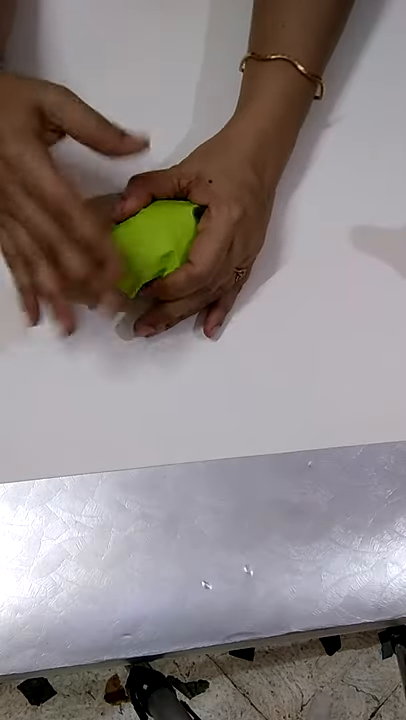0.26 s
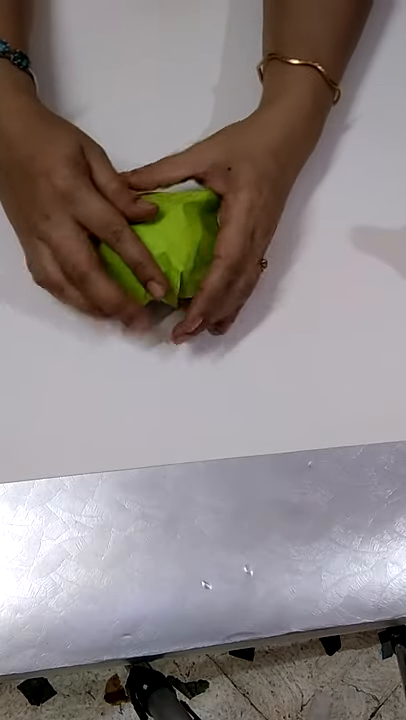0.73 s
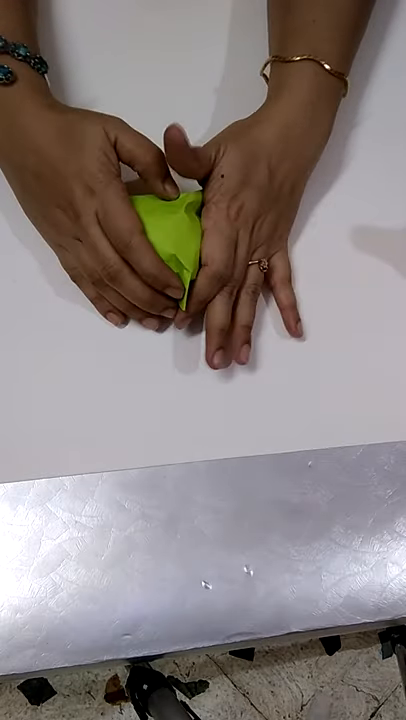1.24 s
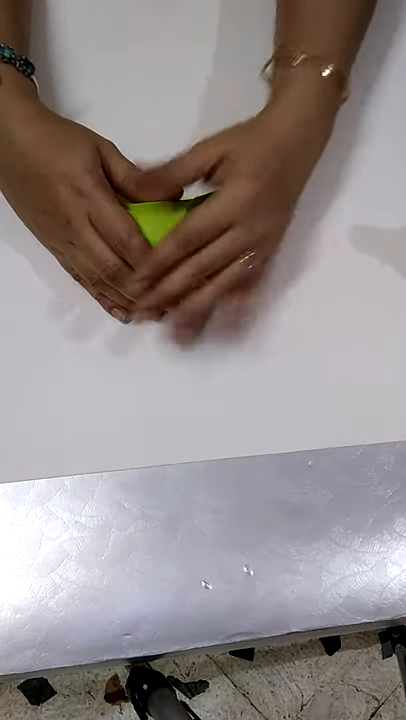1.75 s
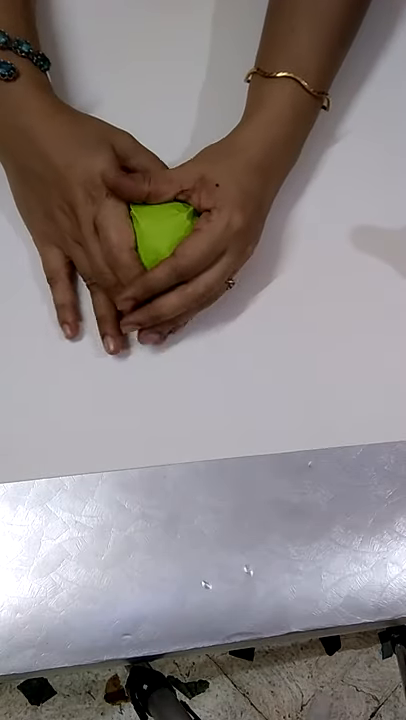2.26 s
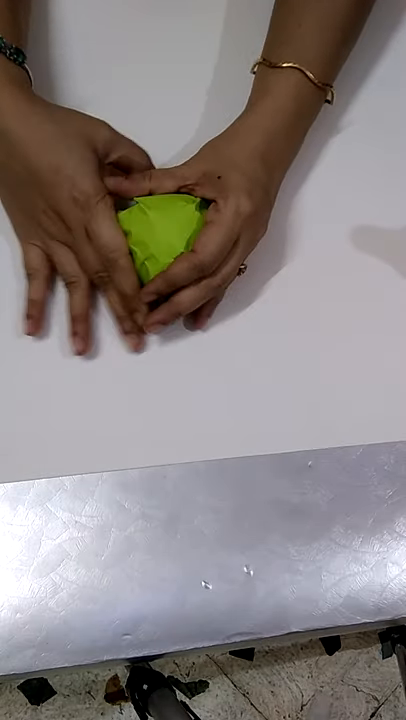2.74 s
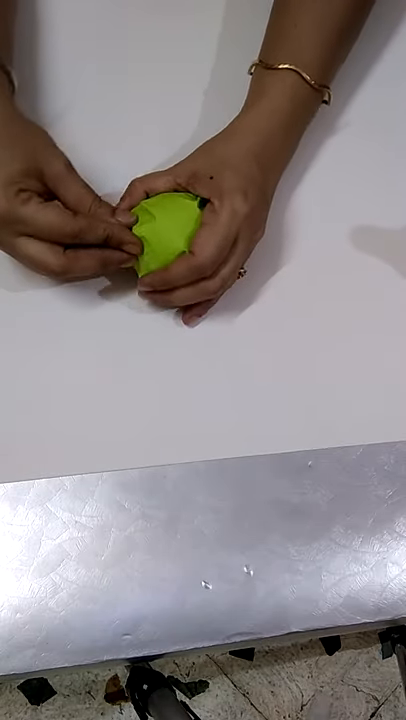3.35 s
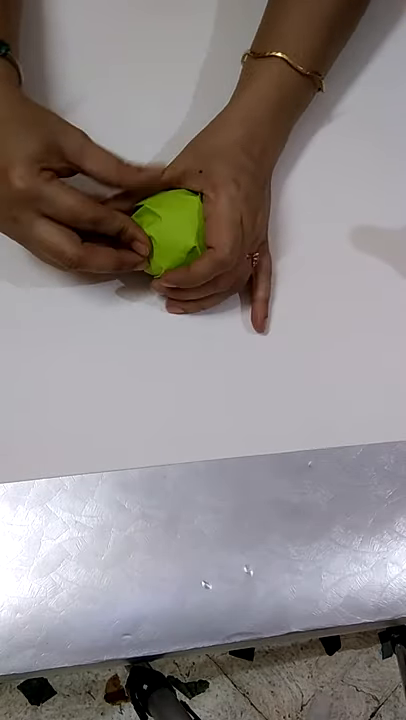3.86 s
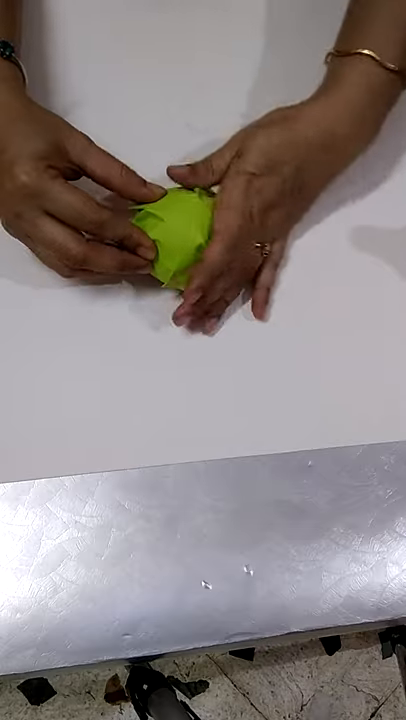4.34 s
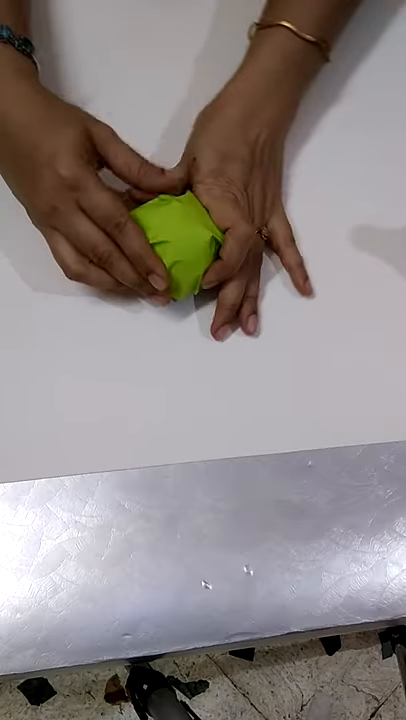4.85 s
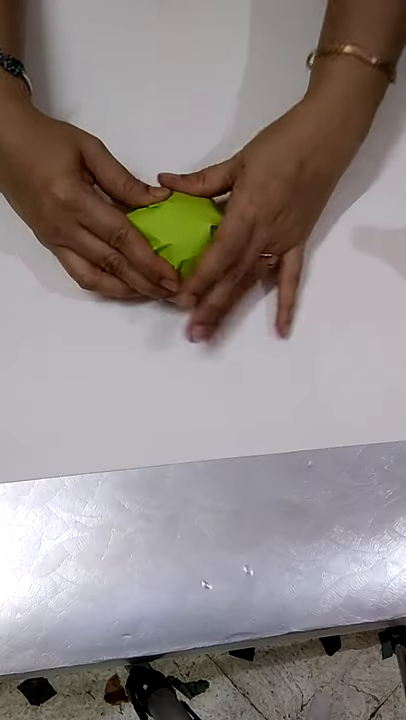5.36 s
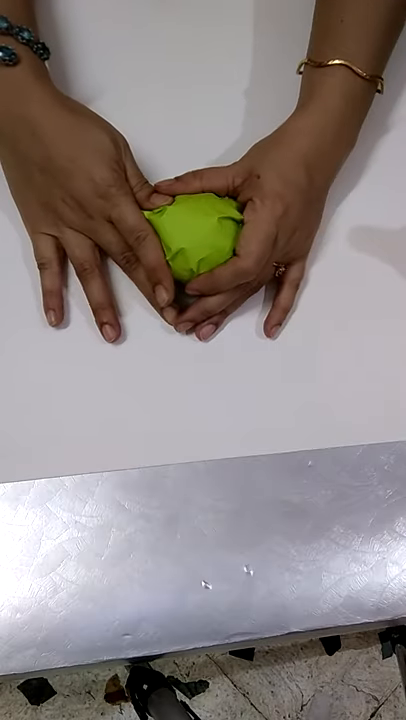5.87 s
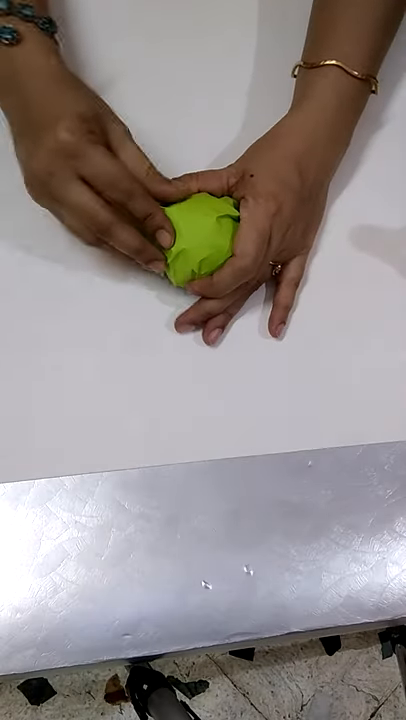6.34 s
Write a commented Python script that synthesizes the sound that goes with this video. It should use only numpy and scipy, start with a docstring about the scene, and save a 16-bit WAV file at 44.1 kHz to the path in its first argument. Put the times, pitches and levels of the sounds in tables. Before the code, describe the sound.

Stiff paper crackles and snaps in sharp, uneven creases as hands fold it around a ball, with soft knocks on a table indoors.

```python
"""Stiff paper is pressed and folded by hands around a ball on a table in a bare, echoing room.
Creases snap and slips rustle as shaped noise through broad paper resonances; trapped air pops as short sines.
Fingers and ball knock the table top, whose ringing modes boom briefly.
Near echoes and a noise tail make the room; quiet air lies under it all and a faint hum comes and goes."""
import sys
import numpy as np
from scipy import signal
from scipy.fft import rfft, irfft
from scipy.io import wavfile

SR = 44100
rng = np.random.default_rng(int(sys.argv[2]) if len(sys.argv) > 2 else 0)


def int16_out(signal):
    """Quantize to a 16-bit WAV file."""
    q = np.round(np.clip(np.atleast_2d(signal).T, -1, 1) * 32767)
    wavfile.write(sys.argv[1], SR, q.astype(np.int16))


def invert_db(x):
    """Field ratio 10**(x/20) for x, a level in decibels (scalar or array-like)."""
    u = np.asarray(x, float) / 20
    return 10 ** u


N = 291060   # length in samples


def rms_one(x):
    """Scale to rms 1."""
    return x / np.sqrt(np.mean(x ** 2) + 1e-20)


def at_hz(points, hz):
    """Read a table of (frequency, value) on a log-frequency axis."""
    table_hz, values = np.array(points).T
    return np.interp(np.log(hz + 1), np.log(table_hz), values)


def drift(rate_hz):
    """Slow chance with spread 1: low-passed noise, drawn at every 40th sample."""
    r = np.exp(-80 * np.pi * rate_hz / SR)
    white = rng.standard_normal(N // 40 + 2002)
    slow = signal.lfilter([1], [1, -2 * r, r * r], white)[2000:]   # skip the filter's start
    return np.interp(np.arange(N) / 40, np.arange(len(slow)), rms_one(slow))


def resonate(x, hz, width_hz):
    """A broad resonance with gain 1 on top."""
    r = np.exp(-np.pi * width_hz / SR)
    gain = (1 - r * r) / 2
    return signal.lfilter([gain, 0, -gain], [1, -2 * r * np.cos(2 * np.pi * hz / SR), r * r], x + 1e-18)


def ring(clicks, hz, t60):
    """A unit click sets a decaying sine of height 1 ringing."""
    r, w = invert_db(-60 / (t60 * SR)), 2 * np.pi * hz / SR
    return signal.lfilter([0, np.sin(w)], [1, -2 * r * np.cos(w), r * r], clicks + 1e-18)


def grains(per_s, spread_db):
    """Clumped random clicks with a long tail of big ones; rms 1."""
    sizes = invert_db(spread_db * np.minimum(rng.exponential(1, N), 4.5)) * rng.choice([-1, 1], N)
    chance = per_s * invert_db(4.0 * drift(25)) / SR
    return rms_one(sizes * (rng.random(N) < chance))


def high_pass(x, hz):
    """Second-order high-pass."""
    return signal.sosfilt(signal.butter(2, hz, "high", fs=SR, output="sos"), x)


# resonance of the air trapped under the folds: (frequency [Hz], width [Hz], gain [dB])
FOLD_AIR_RESONANCE = [(1620, 2700, 20.5)]
# resonances of the paper sheet: (frequency [Hz], width [Hz], gain [dB])
SHEET_RESONANCES = [(2815, 2000, 3.5), (4120, 870, 12.67), (6180, 11500, 9.96), (11600, 3070, 17.02)]


def through_paper(drives):
    """Trapped air and sheet resonate, each on its own drive; neighbouring resonances alternate in sign."""
    out = 0
    for k, (drive, (hz, width_hz, db)) in enumerate(zip(drives, FOLD_AIR_RESONANCE + SHEET_RESONANCES)):
        out = out + (-1) ** k * invert_db(db) * resonate(drive, hz, width_hz)
    return out


def place(s, peak_db, shapes, lead):
    """Scale each shape to its peak and set it in time; a small sheet radiates little of the lows."""
    out = np.zeros(N + shapes.shape[1])
    shapes = invert_db(peak_db)[:, None] * shapes / np.abs(shapes).max(axis=1, keepdims=True)
    starts = np.round(s * SR).astype(int)[:, None] - lead
    np.add.at(out, starts + np.arange(shapes.shape[1]), shapes)
    return high_pass(out[:N], 690)


# fingers sliding over the paper: (start [s], drive level ahead of the paper [dB], length before the fade [s])
FINGER_SLIDES = [(0.152, -51.5, 0.02), (0.486, -53.5, 0.062), (0.8, -73, 0.073), (0.899, -51.5, 0.021),
                 (1.014, -53, 0.041), (1.61, -61.5, 0.037), (1.906, -54.5, 0.068), (2.11, -40, 0.015),
                 (2.314, -62.5, 0.02), (2.551, -55.5, 0.014), (2.787, -52.5, 0.039), (3.226, -53, 0.019),
                 (4.713, -54, 0.055), (5.313, -53.5, 0.046), (6.059, -57.5, 0.088)]
# pitches of the small air pockets: (frequency [Hz])
POCKET_PITCHES = [1296, 1500, 2010]
TICKS_PER_S, TICKS_DB = 470, -7   # lesser creases at random; level relative to the slips
POCKETS_PER_S = 200   # small air pockets popping at random


def rustle(level_db, air_db=24.0, hollow_db=-18.0, rise=0.099):
    """Tiny slips of paper on paper: a thin bed with ticks and pockets, and a rush under each sliding finger."""
    t = np.arange(N) / SR
    sheet, air = invert_db(level_db + 6.0 * drift(14.5)), 0
    ticks = invert_db(level_db + TICKS_DB) * grains(TICKS_PER_S, spread_db=5.0)
    pockets = invert_db(level_db + air_db) * grains(POCKETS_PER_S, spread_db=10.0)
    for s, sheet_db, length_s in FINGER_SLIDES:
        swell = np.clip((t - s) / (rise * length_s), 0, 1)
        fade = np.clip((s + 2 * length_s - t) / length_s, 0, 1) ** 2
        sheet = sheet + invert_db(sheet_db) * swell * fade
        air = air + invert_db(sheet_db + hollow_db) * swell * fade
    # each tick excites one sheet resonance, each pocket has one pitch
    part = rng.integers(0, len(SHEET_RESONANCES), N)
    pocket = rng.integers(0, len(POCKET_PITCHES), N)
    slips = sheet * grains(2000, spread_db=3.5)
    small = 0
    for k, hz in enumerate(POCKET_PITCHES):
        small = small + resonate(resonate(pockets * (pocket == k), hz, 700), hz, 700)
    air_drive = air * grains(500, spread_db=4.0)
    sheet_drives = [slips + ticks * (part == k) for k in range(len(SHEET_RESONANCES))]
    return small + through_paper([air_drive] + sheet_drives)


# the clearest knocks on the table: (time [s], push [dB], lean towards the upper modes [dB])
TABLE_KNOCKS = [(0.139, -31, -7.5), (0.252, -37.5, 11.5), (0.387, -53, 25.5), (0.492, -29, -4.5),
                (1.171, -41, -18), (1.215, -27, -3.5), (1.283, -33, 1.5), (1.324, -33.5, -12.5),
                (1.418, -24, 6), (1.559, -32, 1.5), (1.871, -53.5, 20.5), (1.97, -25.5, -7.5),
                (2.108, -21, -5), (2.195, -24, 5.5), (2.23, -23.5, 1), (2.254, -27, 7), (2.398, -35.5, 5.5),
                (2.469, -29, -1.5), (2.559, -30, 4), (2.622, -32.5, -2), (2.648, -32, 4),
                (2.809, -27.5, -3.5), (2.99, -40, 16), (3.061, -40, 21.5), (3.233, -27.5, -5),
                (3.725, -41, 19.5), (3.809, -38, 7), (4.257, -26.5, 0), (4.589, -36.5, 9.5),
                (4.637, -33, 0.5), (4.908, -30.5, 0), (5.008, -30, 4.5), (5.043, -26, 5.5),
                (5.226, -49.5, 26), (5.281, -45.5, 21), (5.331, -26.5, 5), (5.513, -47, 20.5),
                (5.543, -44, 14), (5.639, -42.5, 1), (5.862, -26.5, 4.5), (5.884, -27, 7.5),
                (5.929, -29, 4), (6.095, -44, 12)]
# modes of the table top: (frequency before detuning [Hz], level [dB], nominal t60 [s])
TABLE_MODES = [(64.9, -24.5, 0.39), (98.3, 2, 0.013), (177.4, 2, 0.25), (224.2, 4.5, 0.12), (271, 2, 0.05),
               (385.6, -9, 0.12), (571.4, -13, 0.063), (722, -14.5, 0.048)]
PRESS_S = 0.004   # time constant of a soft knock's build-up
DAMPED_S = 0.097   # the hands soon still the upper modes
DETUNE = 0.04   # resting hands shift each mode by this share (spread) from knock to knock
THUD, THUD_S = 0.99, 0.0044   # extra share at a knock's first swing, and its decay time
BUMP_UPPER_DB = 4   # the light ball stirs the upper modes more than a finger does


def table(rumble_db, contact_hz=700):
    """Soft knocks and the shuffling ball set the table's modes ringing, a little differently every time."""
    s, peak_db, upper_db = np.transpose(TABLE_KNOCKS)
    t, out = np.arange(SR // 3) / SR, np.zeros(N)
    at = np.round(s * SR).astype(int)[:, None] + np.arange(len(t))
    own = rng.standard_normal((len(s), len(TABLE_MODES), 3))   # each knock's own strength, pitch and decay
    shuffle = invert_db(rumble_db) * grains(150, spread_db=3.5)
    build = 1 - np.exp(-t / PRESS_S)
    thud = 1 + THUD * np.exp(-t / THUD_S)
    for k, (hz, level_db, t60) in enumerate(TABLE_MODES):
        # a knock away from the middle shifts strength from the main boom to the modes above it
        lean = np.clip(np.log2(hz / 200) * 2.5, -.5, .9) * (hz > 150)
        strength = invert_db(peak_db + 2.5 * own[:, k, 0] + upper_db * lean)[:, None]
        own_hz = hz * (1 + DETUNE * own[:, k, 1:2])
        own_t60 = t60 * invert_db(1.2 * own[:, k, 2:])
        rings = np.sin(2 * np.pi * own_hz * t) * invert_db(-60 * t / own_t60)
        rings = rings * np.exp(-(t / DAMPED_S) ** 2 * (hz > 150)) * thud
        knocks = np.bincount(at.ravel(), (strength * rings * build).ravel(), N + len(t))[:N]
        # every bump strikes each mode differently
        strikes = invert_db(BUMP_UPPER_DB * lean) * shuffle * rng.standard_normal(N)
        bumps = ring(strikes, hz, 0.83 * t60)
        # a free plate radiates little far below each of its modes
        out += invert_db(level_db) * high_pass(knocks + bumps, 1.22 * hz)
    return signal.sosfilt(signal.butter(4, contact_hz, fs=SR, output="sos"), out)   # fingertips are soft


# colour of the room air before scaling: (frequency [Hz], relative density [dB per Hz])
AIR_SPECTRUM = [(30, -12), (62, 8), (90, -13), (1500, -15), (3000, -22), (16000, -48)]


def room_air():
    """Quiet air: coloured noise, half of its power common to both sides."""
    hz = np.fft.rfftfreq(N, 1 / SR)
    colour = invert_db(at_hz(AIR_SPECTRUM, hz))
    mid, left, right = irfft(rfft(rng.standard_normal((3, N))) * colour, N)
    return invert_db(-67.5) * rms_one(0.99 * mid + np.array([left, right]))


# colour difference of the two microphone ports: (frequency [Hz], left minus right [dB])
PORT_COLOUR = [(60, -6.5), (180, -2.5), (700, -3.5), (2500, -3.5), (7000, -4.5), (15000, 4)]
LEFT_LAG_S = 0.000142


def at_ports(x):
    """The left port hears the direct sound a little later and with another colour."""
    hz = np.fft.rfftfreq(N, 1 / SR)
    tilt, spectrum = invert_db(at_hz(PORT_COLOUR, hz) / 2), rfft(x)
    left = irfft(spectrum * tilt * np.exp(-2j * np.pi * hz * LEFT_LAG_S), N)
    return np.array([left, irfft(spectrum / tilt, N)])


# near echoes off hands and table: (delay [s], left level [dB], right level [dB])
NEAR_ECHOES = [(.0024, -14, -12), (.0044, -11, -9)]
# decay of the room: (frequency [Hz], t60 [s])
ROOM_DECAY = [(500, 0.2), (1500, 0.4), (12000, 0.31)]
ROOM_DB, ROOM_GAP_S = -6, 0.012   # the wall tail stays faint until the gap has passed
ECHO_SMEAR_S = 0.001   # rough surfaces spread each echo


def room(paper, boom, boom_db=2.0):
    """Near echoes of the paper, then wall noise dying band by band, unlike on each side."""
    t, edges, tail = np.arange(SR // 2) / SR, 400 * 2 ** np.arange(0, 5.6, .5), 0
    white = rng.standard_normal((2, 2, len(t)))   # neighbouring bands take turns on two noises
    for k, (low, high) in enumerate(zip(edges, edges[1:])):
        band_pass = signal.butter(2, [low, high], "band", fs=SR, output="sos")
        band = signal.sosfilt(band_pass, white[k % 2])
        tail = tail + band * invert_db(-60 * t / at_hz(ROOM_DECAY, np.sqrt(low * high)))
    tail = tail * np.clip((t - ROOM_GAP_S) / 0.0012, .15, 1)
    tail = invert_db(ROOM_DB) * tail / np.sqrt((tail ** 2).sum(axis=1, keepdims=True))
    near = 0
    for delay_s, left_db, right_db in NEAR_ECHOES:
        smear = rng.standard_normal(tail.shape) * np.exp(-((t - delay_s) / ECHO_SMEAR_S) ** 2)
        smear = smear / np.sqrt((smear ** 2).sum(axis=1, keepdims=True))
        near = near + invert_db(np.array([[left_db], [right_db]])) * smear
    paper_answer = signal.fftconvolve(paper[None], tail + near, axes=1)
    boom_answer = signal.fftconvolve(invert_db(boom_db) * boom[None], tail, axes=1)
    return (paper_answer + boom_answer)[:, :N]


# single creases buckling, loud and faint: (time [s], peak before the high-pass [dB], brightness [dB per octave])
TIMED_CREASES = [(0.068, -22.5, -4.5), (0.2275, -17, 2.5), (0.3865, -24.5, 0), (0.8901, -29, 4),
                 (1.007, -18.5, -11), (1.1848, -3.5, -3.5), (1.4781, -22, -14), (1.641, -54, 11),
                 (1.8667, -25.5, -1), (2.441, -29.5, 0), (2.472, -37.5, -6), (2.811, -33, 8),
                 (3.031, -23, -5), (3.0625, -22, -3), (3.169, -40, 0), (3.2328, -21.5, 2.5),
                 (3.297, -24, 2.5), (3.3064, -12.5, 0), (3.431, -28.5, 4), (3.482, -26, 3.5),
                 (3.5049, -20, -0.5), (3.71, -26, -3.5), (3.728, -14.5, -2), (3.7472, -18.5, -2.5),
                 (3.762, -18.5, 15), (3.789, -25, -1), (3.808, -13, -0.5), (3.9132, -12, 5.5),
                 (3.922, -48, -1), (4.019, -52, 13), (4.1944, -28, 4), (4.3875, -22.5, -3),
                 (4.4445, -10.5, 2.5), (4.6499, -21, -5), (4.656, -23, -9), (4.686, -17, -2.5),
                 (4.956, -23, -15), (4.96, -7, -4), (5.226, -19, 14), (5.2824, -21.5, 3.5),
                 (5.3324, -20, -1), (5.682, -29, -2), (5.7782, -29, 0), (5.8028, -24.5, 1.5),
                 (5.829, -19, 0), (5.8619, -19, -13.5), (5.909, -20, -1.5), (5.9267, -19, -2),
                 (6.0108, -19.5, -2), (6.3464, -25.5, 2.5), (6.3648, -16, 3), (6.4255, -1.5, 0.5),
                 (6.4294, -9.5, 1), (6.5168, -16.5, 0.5), (6.5374, -19, 4)]


def creases(build_s=0.0002, burst_s=0.0007, debris_s=0.006, tear=0.22, debris=0.04, lead_in=0.02):
    """Each buckle starts with faint swelling noise, gives one sharp step, tears on and sheds uneven clicks."""
    s, peak_db, bright_db = np.transpose(TIMED_CREASES)
    steps = np.arange(-220, 700)   # samples from the sharp step
    noise = rng.standard_normal((len(s), 3, len(steps)))
    time_s = np.where(steps < 0, build_s, burst_s)
    bursts = tear * noise[:, 0] * np.exp(-np.abs(steps) / (time_s * SR))
    bursts += lead_in * noise[:, 1] * (steps < 0) * (1 - steps / steps[0])
    bursts += debris * noise[:, 2] ** 3 / 4 * (steps > 0) * np.exp(-steps / (debris_s * SR))
    bursts[:, steps == 0] = np.sign(bursts[:, steps == 0])   # the sharp step itself
    # brightness tilts the drives of the sheet around 7 kHz
    drives = [bursts * invert_db(bright_db * np.log2(hz / 7000))[:, None] for hz, *_ in SHEET_RESONANCES]
    return place(s, peak_db, through_paper([0 * bursts] + drives), -steps[0])


# tones of the hum: (frequency [Hz], rms before the spells' gain [dB])
HUM_TONES = [(457, -88.5)]
# the hum comes and goes: (start [s], end [s], gain [dB])
HUM_TIMES = [(0.412, 1.136, 13), (1.55, 3.012, 22.5), (6.056, 6.592, 20)]
HUM_FADE_S = 0.028


def room_hum():
    """A faint, slightly wavering sine hum, faded in and out for each spell."""
    t = np.arange(N) / SR
    tones = sum(invert_db(db) * np.sqrt(2) * np.sin(2 * np.pi * hz * t) for hz, db in HUM_TONES)
    spells = 0
    for start, end, db in HUM_TIMES:
        spells = spells + invert_db(db) * np.clip(np.minimum(t - start, end - t) / HUM_FADE_S, 0, 1)
    return tones * spells * invert_db(0.48 * drift(6))


# air trapped under a fold pops: (time [s], peak before the high-pass [dB], pitch [Hz])
AIR_POPS = [(0.817, -45.5, 1060), (1.0046, -35, 2150), (1.1853, -12, 1730), (1.418, -27.5, 1970),
            (1.4752, -24.5, 2700), (1.546, -29, 1400), (2.3367, -35.5, 1370), (2.55, -30, 1490),
            (2.6221, -34.5, 1500), (2.638, -28.5, 2280), (2.693, -29.5, 2350), (2.812, -28, 1560),
            (2.9742, -33, 1470), (2.988, -29.5, 1500), (3.001, -25, 1700), (3.029, -21, 1940),
            (3.0623, -19.5, 1940), (3.2332, -26.5, 2240), (3.689, -35.5, 1470), (3.728, -27.5, 1400),
            (4.235, -46.5, 1400), (4.3873, -28, 1590), (4.649, -39, 1540), (4.762, -35, 1500),
            (4.96, -8.5, 1440), (5.2259, -33.5, 1410), (5.282, -33.5, 1320), (5.3318, -28, 1870),
            (5.512, -44, 1340), (5.57, -36, 1440), (5.682, -42, 1570), (5.779, -36, 1470),
            (5.829, -26.5, 1710), (5.8609, -27.5, 1100), (5.8836, -32, 1250), (5.909, -28, 1500),
            (6.0107, -32, 1500), (6.111, -43, 1340), (6.135, -39, 1370), (6.4251, -16, 1660)]
POCKET_CYCLES = 0.55   # cycles that the air under a fold takes to swell; it dies at the same pace


def pops():
    """The air under a fold swells and dies at its own pitch."""
    s, peak_db, hz = np.transpose(AIR_POPS)
    cycles = hz[:, None] * np.arange(512) / SR
    swell = cycles * np.exp(-cycles / POCKET_CYCLES)
    return place(s, peak_db, np.sin(2 * np.pi * cycles) * swell, 10)


# how busy the hands are: (time [s], slips in the paper [dB], bumps on the table [dB])
HAND_ACTIVITY = [(0, -54.5, -67), (.35, -149, -89.5), (0.698, -81, -103), (1.1, -71.5, -100),
                 (1.298, -59.5, -74.5), (1.55, -86, -70), (1.75, -85.5, -90), (2.298, -66.5, -63),
                 (2.76, -73, -88), (3.05, -57.5, -68.5), (3.25, -121, -84.5), (3.651, -91, -88),
                 (3.8, -82, -81.5), (4.12, -79.5, -89), (4.3, -71.5, -71), (4.55, -86, -100),
                 (4.751, -96.5, -84), (5.049, -56.5, -75.5), (5.45, -102.5, -88.5), (5.647, -58.5, -74.5),
                 (6.1, -95.5, -75), (6.3, -125, -107), (6.6, -76, -64.5)]


def scene():
    """Paper in the room, table under it, air and hum around."""
    s, *columns = np.transpose(HAND_ACTIVITY)
    rustle_db, rumble_db = (np.interp(np.arange(N) / SR, s, column) for column in columns)
    paper = rustle(rustle_db) + creases() + pops()
    boom = table(rumble_db)
    return at_ports(paper + boom) + room(paper, boom) + room_air() + room_hum()


def suppress(x, split_hz=650, open_db=-64, depth_db=15.0, follow_hz=12):
    """The recorder's noise suppressor turns the upper band down while that band is faint."""
    upper = signal.sosfiltfilt(signal.butter(2, split_hz, "high", fs=SR, output="sos"), x)
    r = np.exp(-2 * np.pi * follow_hz / SR)
    power = signal.filtfilt([1 - r], [1, -r], (upper ** 2).mean(axis=0))
    level_db = 10 * np.log10(np.abs(power) + 1e-14)
    faintness = np.tanh((open_db - level_db) / 5.0)   # -1 open, 1 fully turned down
    return x - upper + upper * invert_db(-depth_db * (1 + faintness) / 2)


def top_cut(x):
    """Nothing passes above the cut-off."""
    return signal.sosfilt(signal.butter(12, 17060, fs=SR, output="sos"), x)


def record(dry):
    """The sound is cut steeply above 16 kHz and gently at the low end, then the noise suppressor works."""
    heard = signal.sosfilt(signal.butter(14, 16300, fs=SR, output="sos"), dry)
    heard = high_pass(heard, 47.4)
    mix = suppress(heard)
    return top_cut(mix)


dry = scene()
out = record(dry)
int16_out(out)
```